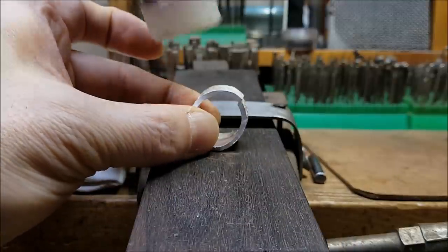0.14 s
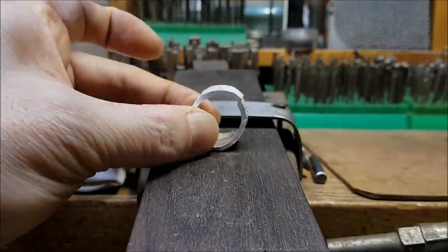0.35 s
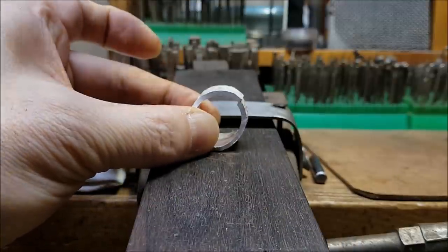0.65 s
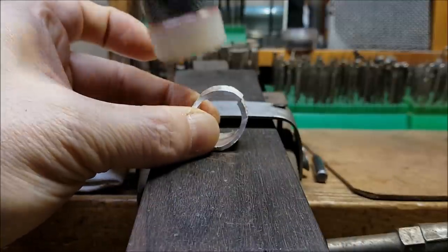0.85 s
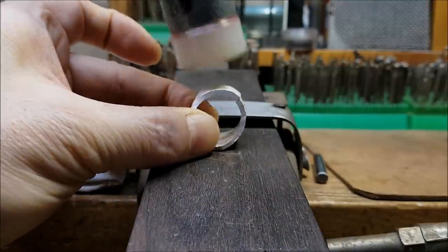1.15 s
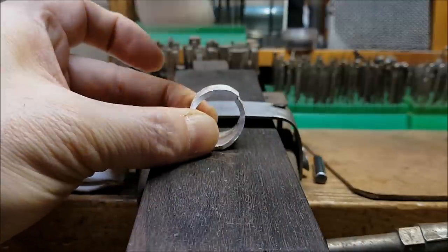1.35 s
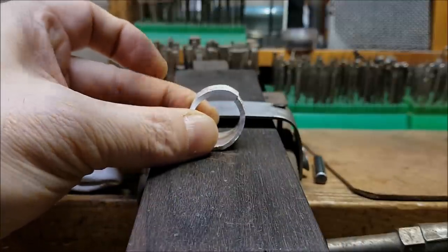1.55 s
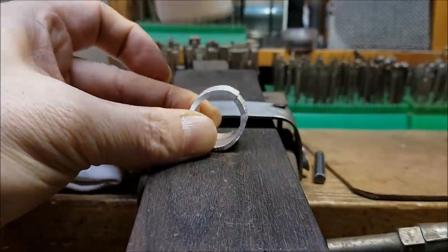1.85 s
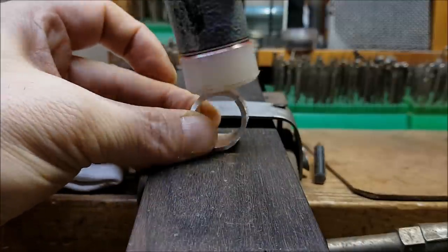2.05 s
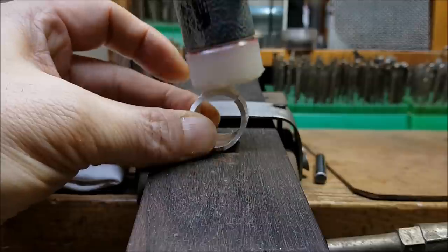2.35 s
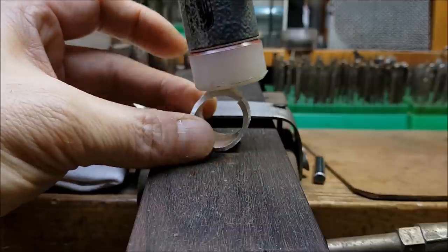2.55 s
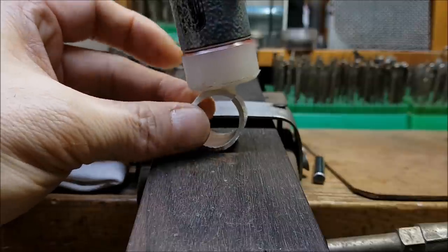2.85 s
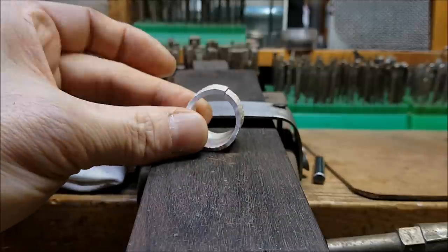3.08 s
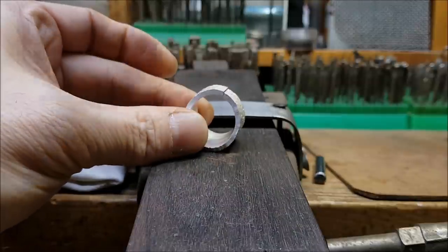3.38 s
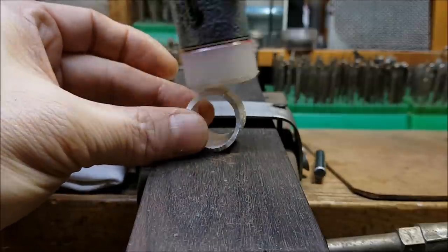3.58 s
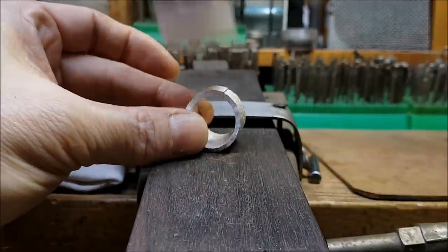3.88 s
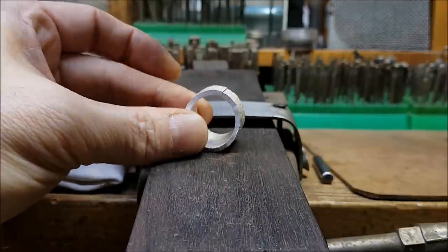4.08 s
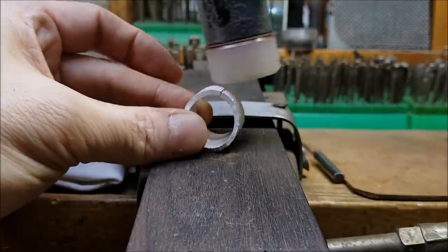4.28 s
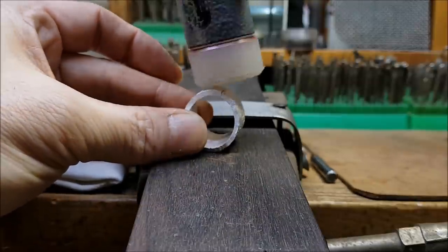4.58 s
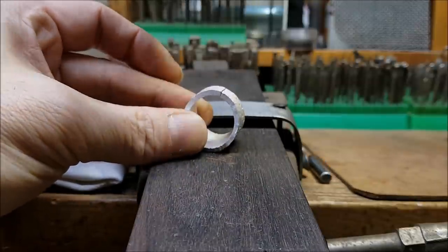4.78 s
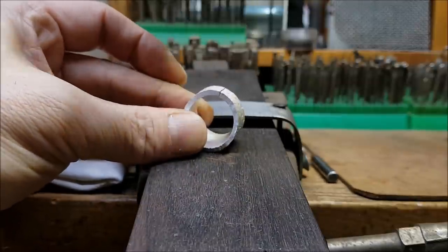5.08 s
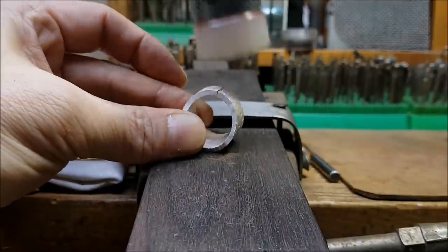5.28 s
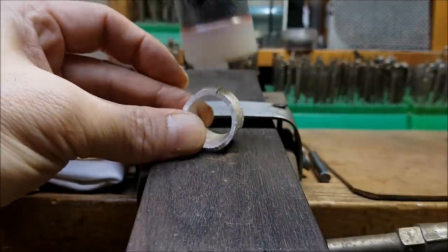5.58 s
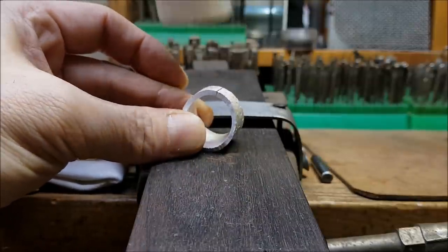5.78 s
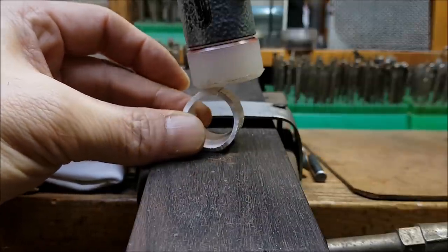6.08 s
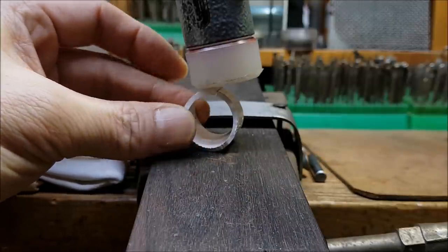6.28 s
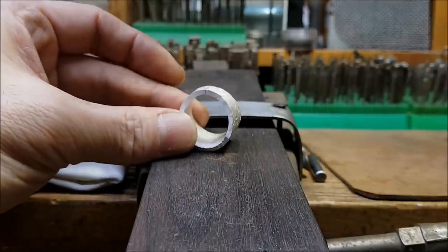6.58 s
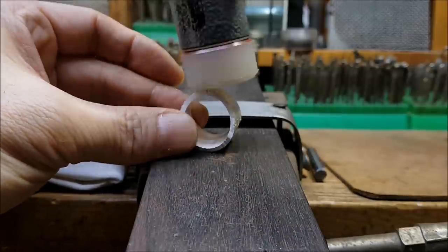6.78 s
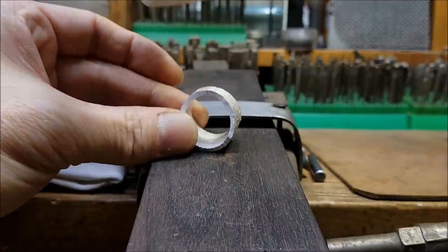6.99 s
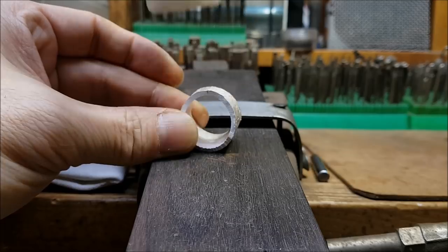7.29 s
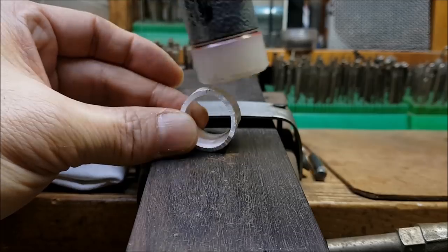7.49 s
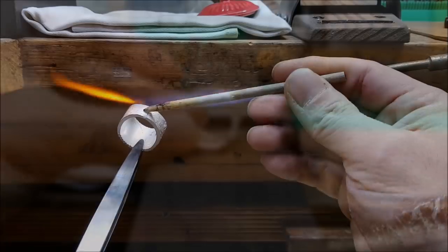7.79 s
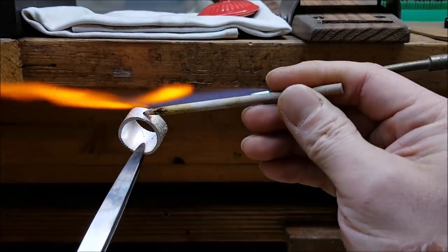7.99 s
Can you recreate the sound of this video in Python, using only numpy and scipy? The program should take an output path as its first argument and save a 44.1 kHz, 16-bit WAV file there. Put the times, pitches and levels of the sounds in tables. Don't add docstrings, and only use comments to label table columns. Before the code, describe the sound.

Jeweller's bench heard close up and fairly dry. Regular mallet knocks land on a small ring, crisp on top and woody underneath, each followed by a lighter clack and quick uneven ticks of loose tools bouncing on wood. Pauses before three seconds and after six leave faint finger rustles and quiet room rumble. After the last knock, the bench stops dead and a broad, steady torch hiss takes over.

```python
import sys
import numpy as np
from scipy import signal
from scipy.fft import rfft, irfft, next_fast_len
from scipy.io import wavfile
from scipy.ndimage import uniform_filter1d, minimum_filter1d

SR = 44100
rng = np.random.default_rng(int(sys.argv[2]) if len(sys.argv) > 2 else 0)


def log_audio(samples):
    frames = np.atleast_2d(samples).T
    limited = np.clip(frames, -1, 1)
    pcm = np.round(limited * 32767).astype(np.int16)
    wavfile.write(sys.argv[1], SR, pcm)


def level_to_linear(level):
    exponent = np.asarray(level, float) / 20
    return 10 ** exponent


N = 358974

# start in seconds, strength in dB, then snap, fizz and spark in dB above the strength.
BLOWS = [(0.0943, -10, -12.5, -20, -26.5), (0.477, -5, -15, -11, -13.5), (0.792, -10.5, -12.5, -14.5, -12),
         (1.1047, -15, -15.5, -13.5, -6), (1.4363, -16, -25, -12, -9), (1.762, -15, -13, -10, -9.5),
         (2.0787, -14, -8.5, -7.5, -8.5), (2.4032, -25, -48, -40, -37), (3.281, -7.5, -24.5, -7, -9.5),
         (3.6199, -8.5, -7.5, -7.5, -14), (3.959, -13.5, 0, -4, -11.5), (4.2779, -13.5, -6.5, -8, -13.5),
         (4.584, -13.5, -4.5, -9, -12.5), (4.8941, -15, -3.5, -6.5, -10), (5.2119, -16, -5.5, -9, -11.5),
         (5.5281, -15.5, -3.5, -7, -11.5), (5.883, -17.5, -0.5, -9, -12), (6.8118, -11, -5, -7.5, -10.5),
         (7.1312, -11.5, -8, -7, -9.5), (7.4903, -10, -12.5, -15.5, -12)]
# air pushed ahead of the head in dB, note of the ring in dB, its pitch in Hz.
STROKES = [(-92.5, -11, 2090), (-72, -11, 730), (-68.5, -23, 4900), (-74, -18.5, 2970), (-74, -16.5, 3030),
           (-72.5, -17, 1100), (-73, -20.5, 1900), (-97, -29.5, 2230), (-79, -25.5, 1800), (-67, -14, 610),
           (-73.5, -16.5, 2090), (-84, -21.5, 3000), (-72, -21.5, 2100), (-78.5, -23, 2086),
           (-82.5, -26.5, 1900), (-71.5, -20, 2400), (-94, -22, 2120), (-86.5, -14.5, 2080),
           (-71.5, -9, 2140), (-95, -16, 2105)]
# bench near 350 Hz, bench at 460 Hz,
# upper pin modes, face at 1450 Hz, face at 2900 Hz.
BLOW_COLOURS = [(-1.5, 6, 1, -5, 6), (0.5, 3, 2, -1.5, 6), (-1, 3, 1.5, -2, -1.5), (0.5, 0, 0.5, -3.5, 0.5),
                (0.5, 2, -1, -4, 5), (-0.5, 0, 0.5, -1.5, -5.5), (2.5, -10.5, -1, 0, -1.5),
                (1.5, 1, -11, -6, 10.5), (0.5, -0.5, -2, -2, -1.5), (0, 0, 1, 1.5, 4),
                (-0.5, 1.5, 0, 3.5, 4.5), (-0.5, 0.5, -1, 0.5, 2), (-2, -2, 1, 1.5, -2),
                (-2.5, 9.5, 4.5, 3, -4.5), (-1, 2.5, -2.5, 1, -8), (1.5, -2, 0.5, -4.5, -9),
                (1, 3, 3, 1.5, -4), (1, -3, 3.5, 5.5, -5), (0.5, 2, 5.5, 2, 8), (1.5, 2, -1, -1, -7)]
SPARK_LEANS = [5, 3.5, 4, 7, 3.5, 6, 2.5, 0, -3, 1, -0.5, -0.5, -0.5, -4, -3, -3, -1.5, 0.5, -2.5, -1.5]
# start in seconds, level in dB, pitch in Hz.
EXTRA_NOTES = [(0.0936, -20, 3100), (.477, -11.5, 2090), (0.479, -21, 3280), (0.7927, -18.5, 950),
               (1.1046, -24, 1050), (2.4022, -22.5, 2900), (3.282, -20, 1479), (3.6185, -17.5, 1450),
               (3.958, -19.5, 2900), (6.8122, -16, 1450), (7.1328, -11.5, 1450), (7.132, -12.5, 2750)]

# pitch in Hz, level in dB, time to fall 60 dB in seconds, left over right in dB.
BENCH_MODES = [(33.57, 13, 0.045, 1.5), (69.43, -18, 0.15, 0.5), (150.6, 0, 0.15, -3), (199.3, 1, 0.16, -2),
               (216, -3, 0.076, -6), (225.8, -6, 0.2, -3.5), (245.9, -10.5, 0.23, -0.5),
               (292.7, -2, 0.11, 2), (330.4, -5.5, 0.14, 3), (373.7, -3, 0.14, 5), (457.3, -5, .12, 4),
               (588, -13, 0.18, -2.5), (665.2, -12, 0.18, 1.5), (775, -22.5, 0.13, 1.5),
               (769, -21.5, 0.21, 3.5), (930.2, -15, .15, 10), (1130, -19.5, 0.096, -1),
               (1265, -26, 0.039, 1)]
# pitch in Hz, level in dB, time to fall 60 dB in seconds.
FACE_MODES = [(1450, -5, 0.089), (2198, -5.5, 0.011), (2920, -1.5, 0.0054)]
# pitch in Hz, level in dB, time to fall 60 dB in seconds.
STEEL_MODES = [(1740, -50, .9), (1775, -52, .9), (2150, -52, .9), (2168, -55, .8), (3580, -52, .5)]
# pitch in Hz, level in dB, time to fall 60 dB in seconds.
TOOL_MODES = [(2420, -10, 0.016), (2677, -9.5, 0.038), (2900, -2.5, .01), (3130, -7.5, 0.0073),
              (3900, -14, 0.0026)]
# pitch in Hz, level in dB, time to fall 60 dB in seconds.
PIN_MODES = [(325, 3.5, 0.038), (355, -4.5, 0.1), (463, -6, 0.094), (689, -5, 0.048), (775, -6.5, .07),
             (928, -1.5, 0.063), (1160, -1.5, 0.041), (1450, -3.5, 0.068), (1630, -1.5, .06),
             (1940, -5.5, 0.12), (2350, -10.5, 0.067)]

# frequency in Hz, level in dB per Hz.
KNOCK_NOISE = [(55, -42), (88, -24), (150, -10.5), (361, -1), (1310, -16.5), (1450, -16), (1720, -18),
               (2550, -24), (2810, -32), (4240, -30), (6390, -34), (11900, -51.5), (16000, -50.5)]
# frequency in Hz, level in dB per Hz.
PIN_NOISE = [(300, -25.5), (600, -3), (900, -0.5), (1450, -2), (2100, -6), (2800, -4.5), (4000, -22),
             (8000, -50)]
# frequency in Hz, level in dB per Hz.
SNAP_BAND = [(2500, -39), (3300, -3), (4400, 2), (5500, -9.5), (7000, -40)]
# frequency in Hz, level in dB per Hz.
FIZZ_BAND = [(4500, -35), (6000, -1.5), (7300, -1), (9500, -14), (11500, -24)]
# frequency in Hz, level in dB per Hz.
SPARK_BAND = [(7500, -34.5), (9800, -3), (13500, -0.5), (15500, -15), (16500, -30.5)]
# frequency in Hz, level in dB per Hz.
PATTER_NOISE = [(80, -34), (150, -11.5), (370, 3), (550, -13.5), (750, -0.5), (1200, -1.5), (1500, -1.5),
                (2000, -2), (2700, -8.5), (3300, -17), (4200, -27), (5500, -27), (9000, -45),
                (16500, -50.5)]
# frequency in Hz, level in dB per Hz.
SWISH_NOISE = [(1760, -45), (3000, -19.5), (6710, -5.5), (7200, -1.5), (8280, -22.5), (9730, -6.5),
               (10700, -13), (13800, -5), (16000, -37.5)]
# frequency in Hz, level in dB per Hz.
BRUSH_NOISE = [(300, -30), (900, -8), (2200, 3), (4500, -3), (5500, -8), (7000, -6), (10500, -13),
               (13000, -25)]

# first landing in seconds, peak in dB, fizz in dB above the peak.
LANDINGS = [(0.1374, -10, -18.5), (0.5426, -14, -23.5), (.854, -26, -10.5), (1.1623, -23.5, -18),
            (1.4871, -31.5, -25), (1.8264, -36.5, -16.5), (2.1525, -26.5, -25.5), (2.4272, -25.5, -30),
            (3.3426, -18, -12), (3.681, -18, -15), (4.0145, -24.5, -20), (4.3329, -19.5, -16),
            (4.6438, -25, -22.5), (4.9526, -24, -14.5), (5.2669, -27, -13.5), (5.58, -38, -16),
            (5.94, -23.5, -15), (6.8725, -25.5, -17), (7.1825, -25, -11.5), (7.5492, -23, -14.5)]
# start in seconds, peak in dB, fizz in dB above the peak.
REBOUNDS = [(0.1643, -16, -18.5), (0.5811, -23, -24), (0.611, -35, -23), (0.8874, -36, -19),
            (1.2091, -24.5, -15.5), (1.8818, -33, -23.5), (1.928, -41.5, -26), (2.214, -29, -24.5),
            (2.2678, -26, -22), (2.4038, -24, -43), (2.4539, -28, -18), (3.3889, -14.5, -26.5),
            (3.4202, -23, -20.5), (3.445, -23.5, -36), (3.719, -24, -22), (3.7457, -29.5, -23),
            (4.0015, -42, 2), (4.6802, -33, -14), (4.992, -26, -19), (5.318, -32, -24),
            (5.3465, -33.5, -12.5), (5.9739, -34.5, -11.5), (7.5833, -26, -27), (7.6274, -34.5, -34)]
SQUARENESS = [2, 3.5, 3, 3, 2.5, 1, 1, 0.5, 4, 2.5, 1, 1, 1.5, 1.5, 2, 0, 1, 2.5, 5, 1, 2, 1, 0.5, 1, 0.5,
              1, 2, 1.5, 0.5, -6, 0, 2.5, 3, 2, 1, 0, 1, 1.5, 0.5, 1, 1, 1, 1.5, 0]
# start in seconds, peak in dB, extra wood
# answer in dB.
ROCKING_STEPS = [(.186, -26, 5), (.226, -48, 5), (0.24, -47, 7), (0.26, -52, 9), (.301, -66, -5),
                 (.639, -42, 6), (.661, -35, 2.5), (0.68, -45, 4.5), (.698, -46, 5.5), (.714, -44.5, 2.5),
                 (.733, -50, 1), (.921, -49, 3), (0.945, -39, 0.5), (0.97, -42.5, -3), (.988, -48.5, 4),
                 (1.008, -47, -2.5), (1.021, -52, 0), (1.051, -55, 1), (1.244, -37.5, 2), (1.274, -45.5, 3),
                 (1.302, -45.5, -1), (1.325, -44, 1), (1.343, -47.5, 2), (1.363, -49, 1),
                 (1.378, -47.5, -2), (1.524, -46, 2), (1.558, -45.5, 3.5), (1.584, -45.5, 5),
                 (1.61, -49, 1.5), (1.629, -48.5, 2), (1.649, -53, 3), (1.666, -50.5, 4.5),
                 (1.688, -56.5, 3.5), (1.967, -60, 9), (2.003, -41.5, 4), (2.034, -43, 0), (2.059, -43, 9),
                 (2.314, -45, 5), (2.355, -40.5, 6), (2.395, -46, 10), (2.474, -35, 2), (2.492, -42.5, 3.5),
                 (2.537, -57.5, 4), (3.456, -30, -2), (3.465, -33, 3.5), (3.48, -43, 7.5), (3.495, -51, 10),
                 (3.514, -52, 5.5), (3.779, -46.5, 5), (4.043, -35, 1), (4.069, -42, 4), (4.093, -36, -1),
                 (4.132, -59, 0), (4.375, -42, 5), (4.41, -42, 5), (4.439, -37.5, 0), (4.46, -43, 5),
                 (4.496, -54, 2.5),
                 (4.701, -45, -1), (5.05, -53, 0.011), (5.072, -74, 0.5), (5.382, -40.5, -2.5),
              (5.626, -44, 1), (5.663, -36, -0.5), (5.698, -39, 0.0059), (5.729, -42, 0), (5.757, -51, 0.5),
              (5.787, -51.5, -0.5), (5.807, -59, 0), (6.002, -40.5, 1), (1.068, -57.5, 1.5),
              (1.082, -60.5, 1), (5.366, -48, 1), (5.398, -50, 0.5)]
# start in seconds, peak in dB.
THUDS = [(0.2, -37), (0.225, -33.5), (.265, -38.5), (0.298, -38), (0.333, -52.5), (2.619, -71),
         (2.926, -53), (2.951, -61.5), (5.15, -57), (6.099, -82.5), (6.254, -73.5), (6.431, -60.5)]
# start in seconds, length in seconds, level in dB.
BRUSHES = [
    (2.921, 0.04, -73),
    (2.954, 0.049, -78.5),
    (3.01, 0.035, -72.5),
    (6.241, .008, -80),
    (6.249, 0.054, -70.5),
    (6.422, .04, -79),
]
# start in seconds, then snap, fizz and spark in dB.
FLICKS = [
    (5.4171, -45, -40.5, -46.5),
]

# time in seconds, hiss level in dB.
FLAME_LEVEL = [
    (7.645, -29),
    (7.649, -25),
    (8.113, -26.5),
    (8.14, -25.5),
]
# frequency in Hz, level in dB per Hz.
JET_NOISE = [(59, -55), (100, -16), (427, -22.5), (1420, -5.5), (1860, -2.5), (2300, -9), (2900, -3),
             (5120, -8.5), (7320, -6.5), (12000, -18.5), (15000, -20), (15400, -25)]
# frequency in Hz, left over right in dB.
JET_LEAN = [(60, 3), (110, -7), (200, 7), (380, 4), (700, 3.5), (1290, 2), (2380, 2), (4400, 4.5),
            (8120, 16.5), (15000, 16.5)]
# centre in Hz, width in Hz, level in dB.
JET_LEFT = [(1885, 200, 1), (2632, 300, 10), (3600, 320, 10.5), (4330, 383, 7), (5665, 190, 0),
            (5700, 500, 0.5), (7200, 150, 10.5), (7150, 450, 6), (8000, 270, 0), (9600, 297, 5),
            (11040, 570, 5), (13100, 500, 8), (13950, 400, 9.5)]
# centre in Hz, width in Hz, level in dB.
JET_RIGHT = [(1940, 294, 6.6), (2900, 300, 5.9), (3850, 500, 8), (4550, 320, 8), (5300, 500, 6),
             (6350, 250, 9), (7300, 400, 5), (7800, 200, 5), (8600, 400, 2), (9850, 210, 4),
             (11500, 2000, 4), (13300, 700, 4)]
# frequency in Hz, time to fall 60 dB in seconds.
SHOP_DECAY = [(100, 0.4), (500, 0.083), (2000, 0.25), (6000, .16), (15000, 0.13)]
# time in seconds, level in dB.
RUMBLE_LEVEL = [(0, -51.5), (.75, -54), (.93, -65), (1.9, -62.5), (2.11, -64), (2.54, -52.5), (2.75, -67),
                (3.33, -62), (3.58, -52), (3.9, -64), (4.489, -57.5), (4.94, -70), (5.3, -62.5),
                (6.62, -69), (7.0, -59.5), (7.3, -65), (7.68, -58.5), (8.14, -71)]
# frequency in Hz, level in dB per Hz.
ROOM_NOISE = [(12, -60), (20, -31), (26, -21), (30, -19), (39, -14.5), (47, -10), (53, -2), (60, -9.5),
              (68, -11.5), (81, -16.5), (127, -13.5), (270, -32), (367, -37), (1220, -54), (16000, -60)]

STEEL_FREED_S = 6.5
BLOW_DELAY_S = 0.00074
SUB_GROWS = 0.51
BENCH_LOW_HZ = 111
THUD_DB, THUD_GROWS = -36.5, 0.59
ROCK_FIZZ_DB = -25.5
HUSH_DB, HUSH_S = -6.5, 0.014
SWISH_LEAD_S = 0.066


def mallet():
    out, t = np.zeros((2, N + SR)), np.arange(SR // 2) / SR
    bench_hz, _, _, bench_lean_db = np.transpose(BENCH_MODES)
    phase = rng.uniform(0, 2 * np.pi, (len(BENCH_MODES), 1))
    skew = rng.standard_normal((len(BENCH_MODES), 1)) * bench_hz[:, None] / 500
    port_phase = phase + np.reshape([-0.5, 0.5], (2, 1, 1)) * skew
    lean = level_to_linear(bench_lean_db / 2)
    spread = 1 - np.exp(-(t / 0.0041) ** 2)
    for blow, colour, top_db in zip(BLOWS, BLOW_COLOURS, SPARK_LEANS):
        s, db, snap_db, fizz_db, spark_db = blow
        low_db, mid_db, pin_db, ring_db, clack_db = colour

        hold = 0.053 * level_to_linear(0.19 * (db + 12.5))
        surge = spread * (1 + 1.436 * np.exp(-((t - 0.016) / hold) ** 2))
        modes = surge * ring(BENCH_MODES, t, 0.43, 0.00085, port_phase)
        modes *= np.where(bench_hz < 100, level_to_linear(SUB_GROWS * (db + 13.5)), 1)[:, None]
        modes[:, 7:10] *= level_to_linear(low_db)
        modes[:, 10] *= level_to_linear(mid_db)
        boom = level_to_linear(-6.5) * np.array([lean @ modes[0], modes[1].T @ (1 / lean)])

        face = level_to_linear([[ring_db], [0], [clack_db]]) * ring(FACE_MODES, t, 1, 0.000071)
        steel = level_to_linear(-12 * (s < STEEL_FREED_S)) * ring(STEEL_MODES, t, 2, 0.003).sum(0)
        crack = ports(face.sum(0) + steel, 9.8, 0.00035)

        knock = puff(t, KNOCK_NOISE, 0.16, 0.004) + level_to_linear(-41) * puff(t, KNOCK_NOISE, 1.0, 0.001)
        pin = level_to_linear(pin_db - 7.5) * puff(t, PIN_NOISE, 0.083, 0.0018, split_hz=150)
        clatter = level_to_linear(-3.0) * spread * knock + pin

        spark_band = [(hz, level + top_db * np.sign(hz - 12000)) for hz, level in SPARK_BAND]
        snap = level_to_linear(snap_db) * bright(t, SNAP_BAND, 0.048, -26) * level_to_linear([[1.5], [-2.5]])
        fizz = level_to_linear(fizz_db) * bright(t, FIZZ_BAND, 0.035, -26.5) * level_to_linear([[3], [-5]])
        spark = level_to_linear(spark_db) * bright(t, spark_band, 0.022, -13.5) * level_to_linear([[4], [-8]])
        add(out, s + BLOW_DELAY_S, level_to_linear(db) * (boom + level_to_linear(-3.5) * crack + clatter + snap + fizz + spark))
    return out[:, :N]


def bright(t, spectrum, t60, tail_db):
    spike = level_to_linear(2.0) * puff(t, spectrum, 0.018, 0.00015)
    spit = level_to_linear(-2.5) * puff(t, spectrum, t60, 0.0013)
    return spike + spit + level_to_linear(tail_db) * puff(t, spectrum, 0.1, 0.002)


def notes():
    out, t = np.zeros((2, N + SR)), np.arange(SR // 10) / SR
    first_notes = [(blow[0], db, hz) for blow, (_, db, hz) in zip(BLOWS, STROKES)]
    for s, db, hz in first_notes + EXTRA_NOTES:
        t60 = 0.045 * level_to_linear(0.18 * (db + 16))
        note = ring([(hz, db - 1.0, t60)], t, 0, 0.00014)[0]
        add(out, s + BLOW_DELAY_S, ports(note, 3.1, 0.00048))
    return out[:, :N]


def tools():
    out, t = np.zeros((2, N + SR)), np.arange(SR // 5) / SR
    for s, db, fizz_db, wood_db in contacts():
        thud_db = THUD_DB + THUD_GROWS * (db + 30.5) - db + wood_db
        tick = ports(ring(TOOL_MODES, t, 1.5, 0.00043, any_phase(TOOL_MODES)).sum(0), 16.0, 0.00047)

        fizz = puff(t, FIZZ_BAND, 0.022, 0.00037)
        fizz += level_to_linear(-9.0) * puff(t, SPARK_BAND, 0.025, 0.0004)
        fizz += level_to_linear(4.5) * puff(t, SNAP_BAND, 0.033, 0.00069)
        fizz *= level_to_linear(fizz_db) * level_to_linear([[3], [-6]])

        patter = level_to_linear(-1.5) * puff(t, PATTER_NOISE, 0.091, 0.0039)
        pin = level_to_linear(-9.5) * ring(PIN_MODES, t, 4.6, 0.0025, any_phase(PIN_MODES)).sum(0)
        thud = level_to_linear(thud_db) * (patter + pin)
        buzz = level_to_linear(thud_db - 17.5) * puff(t, PATTER_NOISE, 0.11, 0.013)
        add(out, s, level_to_linear(db) * (tick + fizz + thud + buzz))
    return out[:, :N]


def contacts():
    hops = [(*row, wood_db) for row, wood_db in zip(LANDINGS + REBOUNDS, SQUARENESS)]
    steps = [(s, db, ROCK_FIZZ_DB, wood_db) for s, db, wood_db in ROCKING_STEPS]
    return hops + steps


def hush():
    ahead = np.transpose(BLOWS)[0][:, None] - np.arange(N) / SR
    dip = np.clip(2 - ahead / HUSH_S, 0, 1) * (ahead > 0)
    return level_to_linear(HUSH_DB * dip.max(0))


def thuds():
    out, t = np.zeros((2, N + SR)), np.arange(SR // 5) / SR
    lower_modes = PIN_MODES[:8]
    for s, db in THUDS:
        wood = ring(lower_modes, t, 2.5, 0.0075, any_phase(lower_modes)).sum(0)
        add(out, s, level_to_linear(db - 2.5) * (wood + level_to_linear(-3.0) * puff(t, PATTER_NOISE, 0.05, 0.0123)))
    return out[:, :N]


def brushes():
    out, t = np.zeros((2, N + SR)), np.arange(SR // 5) / SR
    for s, length, db in BRUSHES:
        swell = np.sin(np.pi * np.minimum(t / length, 1))
        add(out, s, level_to_linear(db) * swell * puff(t, BRUSH_NOISE, 0.3, 0.001) * level_to_linear([[3], [-3]]))
    for s, *levels in FLICKS:
        bands = zip(levels, (SNAP_BAND, FIZZ_BAND, SPARK_BAND))
        flick = sum(level_to_linear(db) * bright(t, band, 0.0394, -15) for db, band in bands)
        add(out, s, flick * level_to_linear([[3], [-6]]))
    return out[:, :N]


def swish():
    out, t = np.zeros((2, N + SR)), np.arange(round(0.05 * SR)) / SR
    swell = np.sin(np.pi * t / t[-1]) ** 2
    for (s, *_), (db, *_) in zip(BLOWS, STROKES):
        hiss = level_to_linear(db + 8.5) * swell * puff(t, SWISH_NOISE, 0.98, 0.001)
        add(out, s - SWISH_LEAD_S, hiss * level_to_linear([[3], [-6]]))
    return out[:, :N]


def torch():
    delays = rng.uniform(0.0024, 0.023, (2, 12, 1))
    sizes = 0.15 * rng.standard_normal((2, 12, 1))

    def peaks(hz, table):
        return 1 + sum(level_to_linear(db) / (1 + ((hz - centre) / width * 2) ** 2) for centre, width, db in table)

    def response(hz):
        both_peaks = np.array([peaks(hz, JET_LEFT), peaks(hz, JET_RIGHT)])
        colour = level_to_linear(along(JET_NOISE, hz)) * both_peaks * (hz < 15700)
        combs = 1 + (sizes * np.exp(-2j * np.pi * hz * delays)).sum(1)
        lean = level_to_linear(along(JET_LEAN, hz) * np.array([[0.5], [-0.5]]))
        lag = np.exp(-2j * np.pi * hz * np.array([[0], [0.000115]]))
        return colour * combs * lean * lag

    start = round(FLAME_LEVEL[0][0] * SR)
    direct, *diffuse = rng.standard_normal((3, N - start))
    pair = coloured(patchy(direct, depth_db=3.0) + 0.6 * np.array(diffuse), response)
    flutter_db = 1.2 * unit(uniform_filter1d(rng.standard_normal(N - start), size=900))
    level = level_to_linear(np.interp(np.arange(start, N) / SR, *np.transpose(FLAME_LEVEL)) + flutter_db)
    return np.pad(level * pair / np.std(pair.mean(0)), ((0, 0), (start, 0)))


def patchy(x, depth_db):
    z = signal.stft(x, nperseg=512)[2]
    field = uniform_filter1d(rng.standard_normal(z.shape), size=5, axis=0)
    field = uniform_filter1d(field, size=5, axis=1)
    return signal.istft(z * level_to_linear(depth_db * unit(field)), nperseg=512)[1][:len(x)]


def shop(x):
    hz, t, z = signal.stft(rng.standard_normal((2, SR // 2)), SR, nperseg=256)
    fade = level_to_linear(-60 * t / along(SHOP_DECAY, hz)[:, None])
    tail = signal.istft(z * fade, SR, nperseg=256)[1]
    late = np.pad(x, ((0, 0), (200, 0)))
    return signal.fftconvolve(late, tail / np.linalg.norm(tail[0]), axes=1)[:, :N]


def room_tone():
    a, b = coloured(rng.standard_normal((2, N)), lambda hz: level_to_linear(along(ROOM_NOISE, hz)))
    level = level_to_linear(np.interp(np.arange(N) / SR, *np.transpose(RUMBLE_LEVEL)))
    return level * unit(np.array([a + 0.2 * b, a - 0.6 * b]))


def ring(modes, t, scatter_db, attack, phase=0):
    hz, db, t60 = np.transpose(modes)[:3, :, None]
    size = level_to_linear(db + scatter_db * rng.standard_normal(db.shape) - 60 * t / t60)
    return size * np.sin(2 * np.pi * hz * t + phase) * (1 - np.exp(-t / attack))


def any_phase(modes):
    return rng.uniform(0, 2 * np.pi, (len(modes), 1))


def puff(t, spectrum, t60, attack, split_hz=400):
    n = min(len(t), 2 ** int(np.log2(1.4 * t60 * SR + 1024) + 1))
    hz = np.fft.rfftfreq(n, 1 / SR)
    apart = np.arctan(hz / split_hz) / 2
    shape = level_to_linear(along(spectrum, hz)) * np.array([np.cos(apart), np.sin(apart)])
    mid, side = irfft(rfft(rng.standard_normal((2, n))) * shape, n)
    fade = level_to_linear(-60 * t[:n] / t60) * (1 - np.exp(-t[:n] / attack))
    burst = unit(np.array([mid + side, mid - side])) * fade
    return np.pad(burst, ((0, 0), (0, len(t) - n)))


def ports(x, lean_db, lag):
    return np.array([x * level_to_linear(lean_db / 2), np.roll(x, round(lag * SR)) * level_to_linear(-lean_db / 2)])


def add(track, s, sound):
    track[:, round(s * SR):][:, :sound.shape[1]] += sound


def unit(x):
    return x / np.sqrt(np.mean(x ** 2) + 1e-20)


def along(points, hz):
    f, v = np.transpose(points)
    return np.interp(np.log(hz + 1), np.log(f + 1), v)


def coloured(x, response):
    m = next_fast_len(x.shape[-1] + 4096)
    return irfft(rfft(x, m) * response(np.fft.rfftfreq(m, 1 / SR)), m)[..., :x.shape[-1]]


def scene():
    bench = mallet() + notes() + tools() * hush() + thuds() + brushes() + swish()
    high_pass = signal.butter(N=4, Wn=BENCH_LOW_HZ, btype="high", fs=SR, output="sos")
    bench = signal.sosfilt(high_pass, bench)
    before_torch = np.arange(N) < FLAME_LEVEL[0][0] * SR
    return (bench + level_to_linear(-15.5) * shop(bench)) * before_torch + torch() + room_tone()


def low_pass(x):
    return signal.sosfilt(signal.butter(12, 17050, fs=SR, output="sos"), x)


def record(dry):
    dry = coloured(dry, lambda hz: np.clip((16700 - hz) / 900, 0, 1))
    need = np.minimum(1, 0.64 / (np.abs(dry).max(0) + 1e-9)) ** 0.98
    gain = uniform_filter1d(minimum_filter1d(need, size=441), size=331)
    return low_pass(dry * gain)


dry = scene()
out = record(dry)
log_audio(out)
```